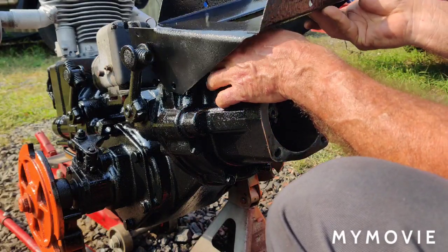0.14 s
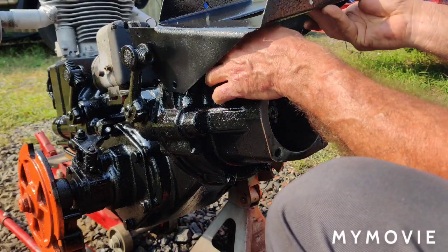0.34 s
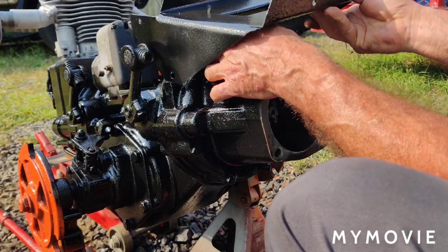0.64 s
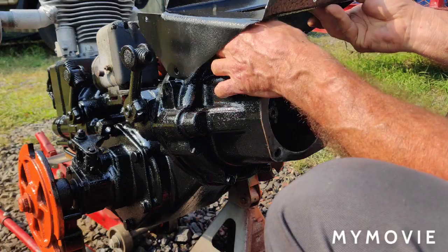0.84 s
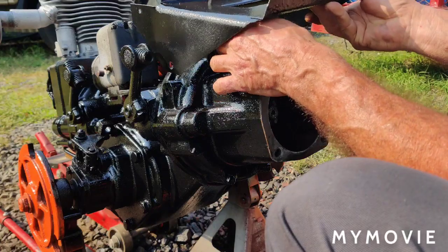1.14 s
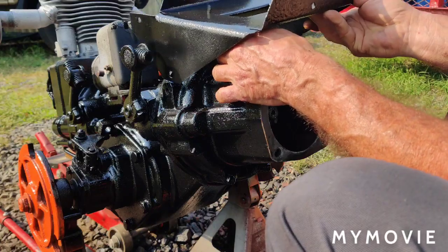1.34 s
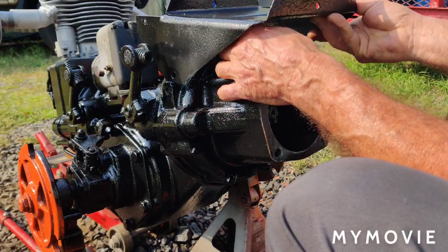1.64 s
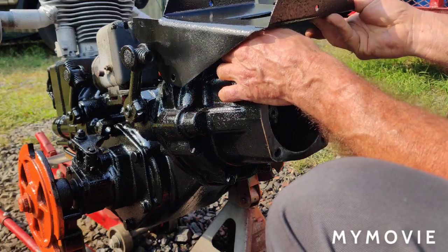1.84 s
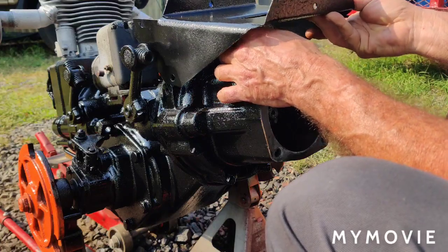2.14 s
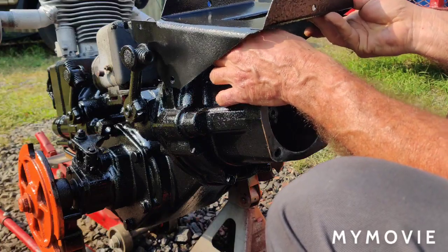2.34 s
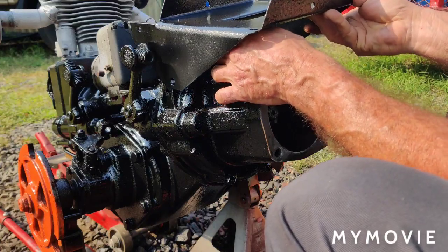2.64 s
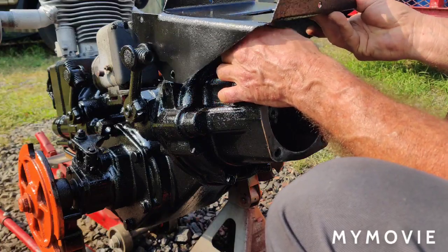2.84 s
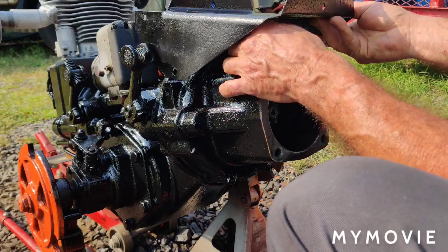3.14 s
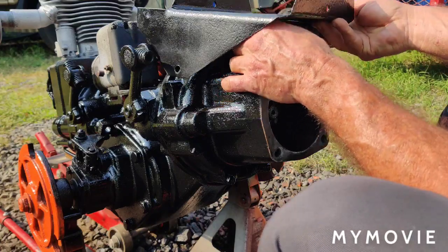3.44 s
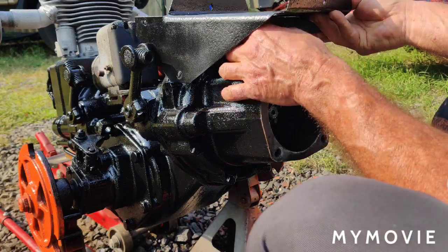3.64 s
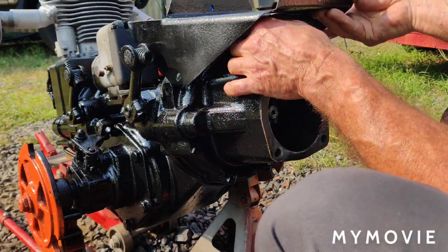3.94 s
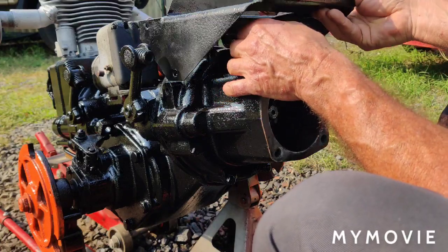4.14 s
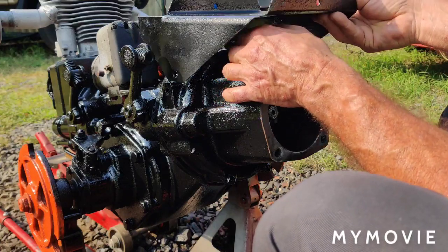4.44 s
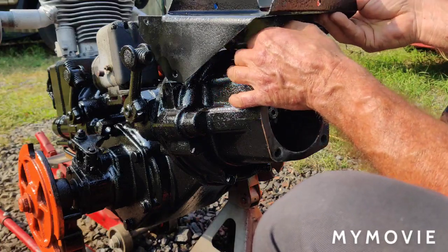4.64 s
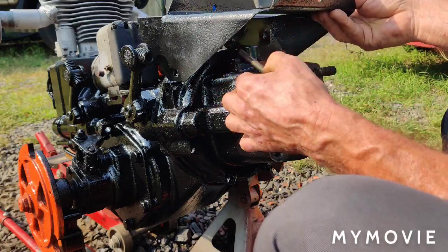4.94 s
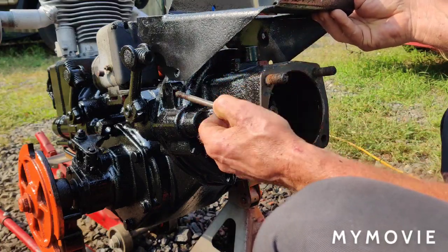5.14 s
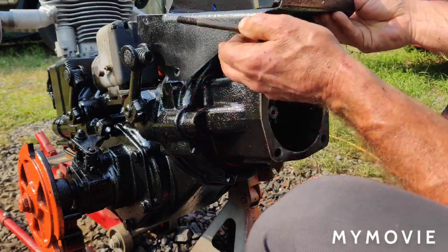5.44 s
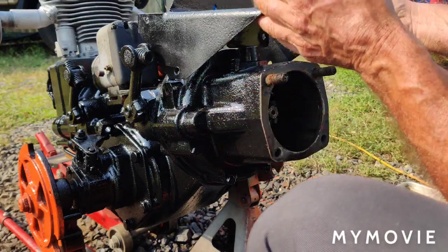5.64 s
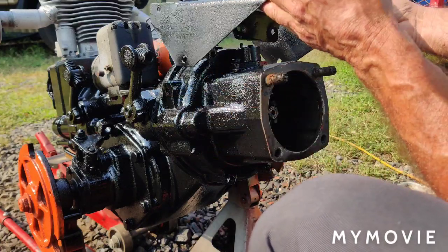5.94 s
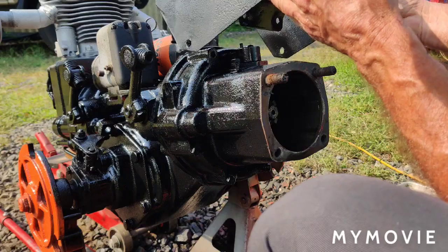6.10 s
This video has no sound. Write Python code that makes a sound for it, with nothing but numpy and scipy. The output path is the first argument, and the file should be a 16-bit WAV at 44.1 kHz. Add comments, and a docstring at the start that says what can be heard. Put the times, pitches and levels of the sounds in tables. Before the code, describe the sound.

Light metal clinks, ticks and dull knocks sound in a yard as crickets chirp and a faraway vehicle hums past.

```python
"""A cricket chirps close by in a yard, with weaker neighbours around it and one far off and blurred.
Each stroke of a chirp is a scraper running along a wing's file, its tone sagging as it slows.
Someone fits a metal cover onto a small engine block: the cover clinks and scrapes lightly,
the block knocks dully and a bolt ticks. A distant motor vehicle hums past, dropping in pitch,
over a farther motor, a steady rumble of traffic and the fine hiss of many insects."""
import sys
import numpy as np
from scipy import signal
from scipy.fft import rfft, irfft, next_fast_len
from scipy.io import wavfile
from scipy.ndimage import uniform_filter1d

SR = 44100
rng = np.random.default_rng(int(sys.argv[2]) if len(sys.argv) > 2 else 0)


def master_out(mix):
    """Clip the mix to full scale and print it as 16-bit PCM to the path in sys.argv[1]."""
    frames = np.transpose(np.atleast_2d(mix))
    ceiling = np.clip(frames, -1, 1)
    pcm = np.round(ceiling * 32767).astype(np.int16)
    wavfile.write(sys.argv[1], SR, pcm)


N = 276507
TIME = np.arange(N) / SR
PADDED = next_fast_len(N, True)


def from_db(db):
    return 10 ** (np.asarray(db) / 20)


def rms_one(x):
    return x / np.sqrt(np.mean(x ** 2) + 1e-20)


def phase_of(hz):
    return 2 * np.pi * np.cumsum(hz) / SR


def automation(rows):
    """Breakpoints, time first, drawn out into one curve for each further column."""
    times, *columns = np.transpose(rows)
    return [np.interp(TIME, times, column) for column in columns]


def drift(rate_hz):
    """A smooth random wobble; rms 1."""
    hz = np.fft.rfftfreq(PADDED, 1 / SR)
    spectrum = rfft(rng.standard_normal(PADDED)) / (1 + (hz / rate_hz) ** 2)
    return rms_one(irfft(spectrum, PADDED)[:N])


def noise(eq):
    """Noise shaped by an EQ curve and rolled off beyond its ends; rms 1."""
    hz, gain_db = np.transpose(eq)
    grid = np.fft.rfftfreq(PADDED, 1 / SR) + 1
    skirts = np.minimum(grid / hz[0], 1) ** 2 * np.minimum(hz[-1] / grid, 1) ** 2
    colour = skirts * from_db(np.interp(np.log(grid), np.log(hz), gain_db))
    return rms_one(irfft(rfft(rng.standard_normal(PADDED)) * colour, PADDED)[:N])


def narrow_noise(hz, width_hz):
    """A tone whose strength and phase wander; rms 1."""
    phase = phase_of(np.full(N, hz))
    return rms_one(drift(width_hz / 2) * np.cos(phase) + drift(width_hz / 2) * np.sin(phase))


def gate(start, end, fade_s):
    """Fades in around the start and out around the end."""
    return np.clip((TIME - start) / fade_s + .5, 0, 1) * np.clip((end - TIME) / fade_s + .5, 0, 1)


def clicks(times, level_db):
    out = np.zeros(N)
    out[(np.asarray(times) * SR).astype(int)] = from_db(level_db)
    return out


def ring(force, hz, t60):
    """One mode: a unit click sets a sine of height 1 ringing."""
    radius, angle = from_db(-60 / (t60 * SR)), 2 * np.pi * hz / SR
    return signal.lfilter([0, np.sin(angle)], [1, -2 * radius * np.cos(angle), radius ** 2], force + 1e-18)


def decay(force, t60):
    """Every click triggers a dying envelope."""
    return signal.lfilter([1], [1, -from_db(-60 / (t60 * SR))], force + 1e-18)


def add_centred(out, centre_s, sound):
    at = round(centre_s * SR) - len(sound) // 2 + np.arange(len(sound))
    inside = (at >= 0) & (at < N)
    out[at[inside]] += sound[inside]


# Reflections off ground, engine and walls. Each row: delay in seconds, gain in dB.
ECHOES = [(.0042, -47), (0.012, -24), (0.023, -42), (.029, -19.5)]

def yard(x, scatter_db, t60):
    """Adds a few distinct echoes and a short scatter from grass and walls."""
    age = TIME[:SR // 2]
    tail = rng.standard_normal(len(age)) * from_db(-60 * age / t60)
    scatter = signal.fftconvolve(x, tail / np.linalg.norm(tail))[:N]
    echoes = sum(from_db(db) * np.interp(TIME - lag, TIME, x, left=0) for lag, db in ECHOES)
    return x + from_db(scatter_db) * scatter + echoes


def wing_stroke(sweep, shift_hz, octave_db, third_db, rough, stretch=1):
    """The scraper runs along the wing's file and slows down, so the tone sags as it ends."""
    times, height, hz = np.transpose(sweep)
    age = np.arange(-SR // 32, SR // 32) / SR / stretch
    pitch = shift_hz + np.interp(age, times, hz)
    phase = phase_of(pitch)
    uneven_teeth = rms_one(uniform_filter1d(rng.standard_normal(len(age)), size=60))
    envelope = np.interp(age, times, height, left=0, right=0) * (1 + rough * uneven_teeth)
    # The octave is strong only while it lies on a resonance of the wing.
    octave = from_db(octave_db) / (1 + ((pitch - 4105) / 70) ** 2)
    tone = np.sin(phase) + octave * np.sin(2 * phase) + from_db(third_db) * np.sin(3 * phase)
    return np.sqrt(2) * envelope * tone


# A full stroke before stretching. Each row: seconds from its peak, amplitude, pitch in Hz.
LONG_SWEEP = [(-.017, .14, 4120), (-.006, .68, 4100), (0, 1.07, 4065), (.0035, .85, 4005),
              (.0065, .27, 3910), (.009, .36, 3820), (.013, .12, 3710)]
# A short stroke. Each row: seconds from its peak, amplitude, pitch offset in Hz.
SHORT_SWEEP = [(-.014, .14, 160), (-.007, .42, 140), (0, 1.1, 5), (.004, .72, -120), (.008, .18, -240)]
# The body of a chirp. Each row: lead on the chirp's cue in seconds, gain in dB, length factor.
FULL_STROKES = [(.1005, 0, 0.77), (.052, 0.4, 1.0), (0.00081, .5, 0.97)]
# Chirps, cued at the last stroke. Each row: cue in seconds, level in dB, stroke length factor.
NEAR_CHIRPS = [(.029, -39.5, 1.4), (.941, -38.5, 1.0), (1.619, -38, 0.92), (2.574, -40, 1.37),
               (3.241, -36, 1.0), (3.950, -37.5, 1.03), (4.666, -38.5, 0.96), (5.215, -37.7, 1.04),
               (5.917, -41, 1.25)]

def near_cricket():
    """Each chirp is one soft opening wing stroke and three full ones, each slightly detuned."""
    opening_lead_s, opening_db, opening_hz = .137, -17, 3930
    out = np.zeros(N)
    detunes_hz = 12 * rng.standard_normal((len(NEAR_CHIRPS), len(FULL_STROKES)))
    for (cue, db, length), detunes in zip(NEAR_CHIRPS, detunes_hz):
        opening = wing_stroke(SHORT_SWEEP, opening_hz, octave_db=-18, third_db=-38, rough=.14)
        add_centred(out, cue - opening_lead_s, from_db(db + opening_db) * opening)
        for (lead, gain_db, share), detune in zip(FULL_STROKES, detunes):
            stroke = wing_stroke(LONG_SWEEP, detune, octave_db=-17.5, third_db=-29.5, rough=.055,
                                 stretch=length * share)
            add_centred(out, cue - lead, from_db(db + gain_db) * stroke)
    return out


# The pass-by. Each row: time in seconds, firing rate in Hz, level of the firing tone in dB.
PASS_BY = [(0, 118.7, -44), (1, 115.4, -47.5), (2, 110.9, -38.5), (2.75, 108.9, -37), (3.12, 108.5, -30),
           (3.3, 106.2, -33.5), (3.5, 99.3, -34.5), (4.05, 95.3, -30), (4.36, 94.6, -35),
           (4.55, 94.34, -43), (5, 92.9, -38.5), (6.27, 90.5, -51)]

def passing_motor():
    """Only low engine orders carry this far; the third booms as it sinks through the exhaust resonance."""
    exhaust_hz, exhaust_width_hz = 151.5, 6.2
    firing_hz, firing_db = automation(PASS_BY)
    turn = phase_of(firing_hz / 2)
    boom = from_db(-23) + from_db(-13) / (1 + ((1.5 * firing_hz - exhaust_hz) / exhaust_width_hz) ** 2)
    orders = np.sin(2 * turn) + boom * np.sin(3 * turn) + from_db(-34) * np.sin(4 * turn)
    hum = from_db(firing_db + 1.04 * drift(28)) * orders
    # The throb at half the firing rate follows the hum's swells only slightly.
    throb = from_db(-46.5 + .19 * (firing_db - firing_db.mean())) * np.sin(turn)
    return np.sqrt(2) * (hum + throb)


# A second hum. Each row: time in seconds, pitch in Hz, level before the fade-out in dB.
FARTHER_MOTOR = [(0, 100.3, -34), (.9, 95.06, -47), (2, 91.5, -42.5), (2.55, 90.95, -38), (3.2, 90.5, -45)]

def farther_motor():
    """A bare low tone that sinks in pitch and is gone by about three seconds."""
    hz, db = automation(FARTHER_MOTOR)
    return np.sqrt(2) * from_db(db) * np.sin(phase_of(hz)) * gate(-1, 2.8, fade_s=.48)


# Wavering traffic drones. Each row: pitch in Hz, opening level in dB, change in dB per second.
DRONES = [(124.5, -47, .3), (148.2, -54.5, 0), (180.5, -50, -1.5), (197.5, -49, -0.64), (222.4, -51, -1.75)]
# EQ curves of the low rumble and the soft wash. Each row: frequency in Hz, gain in dB.
RUMBLE_EQ = [(20, 5.5), (35, -4.5), (55, 7.5), (80, 2), (125, 2.5), (170, -5), (220, -8), (280, -11.5),
             (380, -19.5), (600, -30)]
WASH_EQ = [(300, 0), (500, -2), (800, 2.5), (1200, -1.5), (1900, -2), (2600, -8.5), (3400, -13.5),
           (5000, -16.5)]

def traffic():
    """A bed of drones, rumble and a wash of far sounds that eases off as the traffic recedes."""
    rumble_db_per_s, wash_db_per_s = -.66, -.82
    drones = sum(from_db(db + slope * TIME) * narrow_noise(hz, width_hz=3.04) for hz, db, slope in DRONES)
    rumble = from_db(-36 + rumble_db_per_s * TIME + .78 * drift(1)) * noise(RUMBLE_EQ)
    wash = from_db(-49 + wash_db_per_s * TIME + .5 * drift(4.5)) * noise(WASH_EQ)
    return drones + rumble + wash


# EQ curve of the insect hiss. Each row: frequency in Hz, gain in dB.
CHORUS_EQ = [(3300, -28), (4000, 3), (4600, -2), (5100, 3.5), (5350, 2), (5620, -1), (5950, -0.5),
             (7000, -1), (7700, -1.5), (8200, -1), (9000, -10.5), (10500, -23.5), (13200, -18),
             (15500, -16)]
# Thin trills. Each row: pitch in Hz, bandwidth in Hz, average level in dB.
TRILLS = [(4650, 200, -73.5), (5600, 160, -73), (8180, 250, -78.5)]

def insect_chorus():
    """Many distant insects blend into a fine hiss in which trills come and go."""
    hiss = from_db(-60 + .77 * drift(12)) * noise(CHORUS_EQ)
    trills = sum(from_db(db + 3 * drift(2.7)) * narrow_noise(hz, width) for hz, width, db in TRILLS)
    return hiss + trills


# Answering chirps. Each row: last stroke in seconds, its level in dB, pitch in Hz, dB gained per stroke.
NEIGHBOUR_CHIRPS = [(.193, -43.5, 3990, 5), (.355, -50, 4000, 2), (.75, -55.5, 4200, 3),
                    (1.254, -60, 4140, 1.5), (1.423, -43, 3950, 7), (1.775, -43, 3950, 17),
                    (2.089, -43, 3940, 11), (2.456, -43.5, 3890, 11), (2.693, -58.5, 4180, -2),
                    (2.797, -43, 3950, 10), (2.908, -54, 4020, 4), (3.607, -44, 4000, 8),
                    (3.783, -51, 4030, 10), (3.982, -43, 3930, 12), (4.164, -57, 4100, 3),
                    (4.355, -42.5, 3930, 9.5), (4.518, -49.5, 4020, 8), (4.726, -47, 4000, 9),
                    (5.449, -51, 4000, 0.5), (6.015, -52.5, 4040, -0.5), (6.216, -54, 4150, 2)]

def neighbour_crickets():
    """Three short wing strokes to a chirp, mostly growing louder."""
    gap_s = .0475
    out = np.zeros(N)
    for cue, db, hz, growth_db in NEIGHBOUR_CHIRPS:
        for back in range(3):
            stroke = wing_stroke(SHORT_SWEEP, hz, octave_db=-16, third_db=-40, rough=.18)
            add_centred(out, cue - back * gap_s, from_db(db - back * growth_db) * stroke)
    return out


# Dull knocks on the block. Each row: start in seconds, strike level in dB.
KNOCKS = [(0.118, -45.5), (0.424, -39.5), (1.562, -39), (3.082, -41), (3.343, -44), (4.24, -44),
          (4.457, -39)]
# The block's modes. Each row: frequency in Hz, gain in dB, seconds to decay by 60 dB.
BLOCK_MODES = [(360, -30, 0.025), (473, -2.5, 0.041), (569, -1, 0.029), (800, -22, 0.052)]

def block_knocks():
    """The heavy casting answers each bump with a short low knock."""
    starts, level_db = np.transpose(KNOCKS)
    return sum(ring(clicks(starts, level_db + db), hz, t60) for hz, db, t60 in BLOCK_MODES)


# Light scrapes. Each row: start in seconds, end in seconds, hiss level in dB.
SCRAPES = [(0.2, 0.342, -62), (0.797, 0.933, -59.5), (2.442, 2.578, -62), (4.133, 4.20, -64),
           (5.665, 5.722, -65)]
# EQ curve of metal friction. Each row: frequency in Hz, gain in dB.
FRICTION_EQ = [(1200, 5.5), (2500, -1), (5000, 9), (8000, -6), (10500, -6), (15000, -12)]
# Squeak bands. Each row: pitch in Hz, bandwidth in Hz, relative level in dB.
SQUEAKS = [(2270, 160, 6.5), (8240, 440, 6.5), (9500, 300, -3)]

def cover_scrapes():
    """Metal sliding on metal hisses unevenly and squeaks thinly."""
    slides = sum(from_db(db) * gate(start, end, fade_s=.036) for start, end, db in SCRAPES)
    grain = from_db(3 * drift(60))
    squeak = sum(from_db(db - 8.5) * narrow_noise(hz, width) for hz, width, db in SQUEAKS)
    return slides * grain * (noise(FRICTION_EQ) + squeak)


# Blurred chirps. Each row: start in seconds, length in seconds, relative level in dB.
FAR_CHIRPS = [(0.388, 0.2, -55.5), (0.825, 0.25, -56), (1.135, 0.092, -59), (1.53, 0.21, -57),
              (2.103, 0.15, -55.5), (2.868, 0.16, -56.5), (3.335, 0.16, -56.5), (3.795, 0.14, -56.5),
              (4.15, .17, -68), (4.605, 0.17, -58.5), (4.932, 0.18, -57), (5.38, 0.14, -55),
              (5.78, 0.16, -54), (6.148, 0.17, -55)]

def far_cricket():
    """Many paths smear its strokes into a throbbing band."""
    pitch_hz, strokes_per_s = 4425, 26
    chirps = sum(from_db(db) * gate(start, start + length, fade_s=.032) for start, length, db in FAR_CHIRPS)
    throb = 1 + .21 * np.sin(phase_of(strokes_per_s + 1.5 * drift(3.2)))
    tone = narrow_noise(pitch_hz, width_hz=210)
    tone += from_db(-17) * narrow_noise(2 * pitch_hz, width_hz=400)
    tone += from_db(-23) * narrow_noise(13250, width_hz=510)
    return from_db(-1.2) * yard(chirps * throb * tone, scatter_db=-10.5, t60=.9)


# A bolt taps the cover. Each row: start in seconds, relative level in dB.
TICKS = [(0.4244, -55), (1.7686, -51), (3.1121, -50), (3.6714, -51.5), (3.7018, -52), (3.9744, -56),
         (4.1588, -53), (4.2494, -55), (4.3756, -56), (5.0953, -53), (5.132, -51), (5.238, -53),
         (5.696, -53)]
# The steel bolt's modes. Each row: frequency in Hz, gain in dB, seconds to decay by 60 dB.
BOLT_MODES = [(5010, 1, 0.057), (5290, 2, 0.099), (5470, -17, .04), (7910, 0, 0.05), (9500, -10, 0.067)]

def bolt_ticks():
    """Each tick starts with a dry crack and sets the bolt tinkling briefly."""
    starts, level_db = np.transpose(TICKS)
    variation_db = 2.1 * rng.standard_normal((len(starts), len(BOLT_MODES)))
    tinkle = sum(ring(clicks(starts, level_db + db - 4 + variation_db[:, k]), hz, t60)
                 for k, (hz, db, t60) in enumerate(BOLT_MODES))
    crack = decay(clicks(starts, level_db - 1), t60=.08) * noise(FRICTION_EQ)
    return crack + tinkle


def with_rebounds(blows, touches, gap_s, loss_db):
    """The loose cover bounces: each blow becomes a quick run of ever weaker touches."""
    return [(start + k * gap_s, db - k * loss_db, *rest)
            for start, db, *rest in blows for k in range(touches)]


# Blows on the cover. Each row: start in seconds, relative level in dB, brightness in Hz, rim gain in dB.
CLINKS = [(.425, -39.5, 4900, -1), (1.562, -46, 1100, -13), (1.769, -30, 5000, 1.5),
          (1.911, -37, 1900, -19), (3.082, -39, 1296, 2), (3.112, -34, 6000, -11), (3.341, -46, 1520, -5),
          (3.436, -46, 2475, 2), (3.913, -43, 3020, -3), (4.70, -46, 2500, 3), (5.70, -45.5, 3030, -18)]
# The cover's modes. Each row: frequency in Hz, gain in dB, seconds to decay by 60 dB.
COVER_MODES = [(590, -13, 0.063), (697, -16, 0.15), (986, -9, 0.081), (1043, -15, 0.21),
               (1168, -7.5, 0.078), (1436, -7, 0.21), (1640, -6.5, 0.095), (1820, -17, .1),
               (2043, -5.5, .19), (2105, -5, .075), (2298, 2.5, 0.048), (2406, -19, .15),
               (2540, -13.5, .09), (2670, -11, 0.086), (2880, -4, 0.048), (3180, -17, .04),
               (4129, -14, .06), (4730, -10, .04)]
# EQ curve of the clatter. Each row: frequency in Hz, gain in dB.
CLATTER_EQ = [(450, 0), (1100, 7.5), (1600, 0), (2300, 0), (2850, 3), (3400, -2), (5000, -15), (8000, -36)]

def cover_clinks():
    """Each touch rings every mode; a soft contact dulls the highs, a rim hit brings out the rim's note."""
    rim_hz, rim_width_hz = 2080, 430   # the modes that move the rim most
    hits = with_rebounds(CLINKS, touches=3, gap_s=.0095, loss_db=5)
    starts, level_db, bright_hz, rim_db = np.transpose(hits)
    starts = starts + .0003 * rng.standard_normal(len(starts))
    variation_db = .98 * rng.standard_normal((len(starts), len(COVER_MODES)))
    ringing = np.zeros(N)
    for k, (hz, mode_db, t60) in enumerate(COVER_MODES):
        dull_db = 10 * np.log10(1 + (hz / bright_hz) ** 2)
        place_db = rim_db * np.exp(-((hz - rim_hz) / rim_width_hz) ** 2)
        strike_db = level_db + mode_db + place_db - dull_db + variation_db[:, k] - 4
        ringing += (-1) ** k * ring(clicks(starts, strike_db), hz, t60)
    # Many quickly damped modes merge into a short clatter.
    clatter = decay(clicks(starts, level_db - 4.5), t60=.024) * noise(CLATTER_EQ)
    return yard(ringing + clatter, scatter_db=-12.5, t60=.21)


def scene():
    """Crickets and metalwork over the distant bed, in mono."""
    crickets = yard(near_cricket() + neighbour_crickets(), scatter_db=-9.5, t60=.12) + far_cricket()
    metalwork = cover_clinks() + block_knocks() + bolt_ticks() + cover_scrapes()
    bed = passing_motor() + farther_motor() + traffic() + insect_chorus()
    return (crickets + metalwork + bed)[None]


def record(dry):
    """A steep low-pass takes off the very top."""
    cutoff_hz = 15800
    return signal.sosfiltfilt(signal.ellip(10, .05, 70, cutoff_hz, fs=SR, output="sos"), dry)


dry = scene()
out = record(dry)
master_out(out)
```